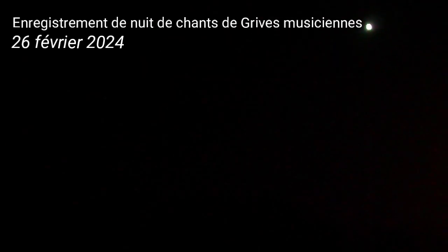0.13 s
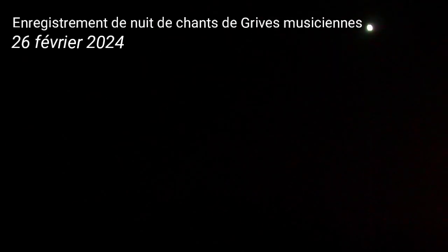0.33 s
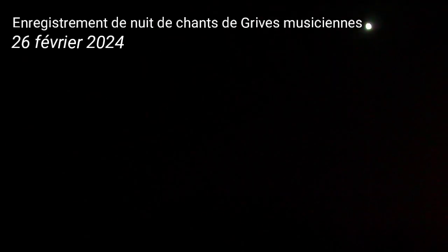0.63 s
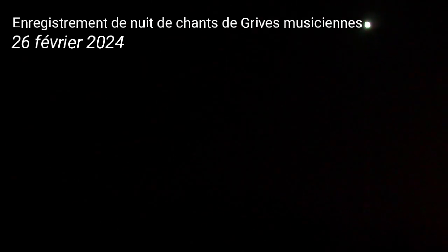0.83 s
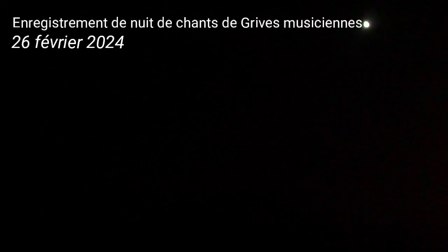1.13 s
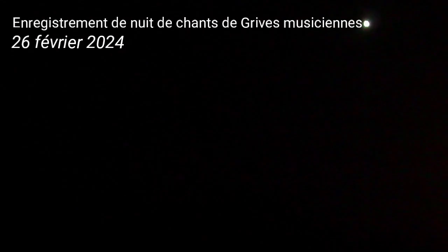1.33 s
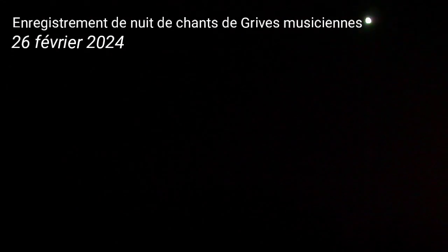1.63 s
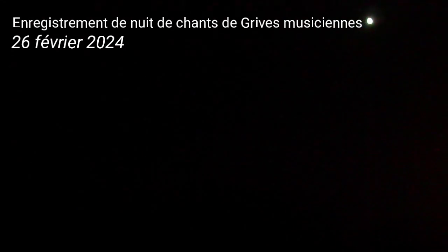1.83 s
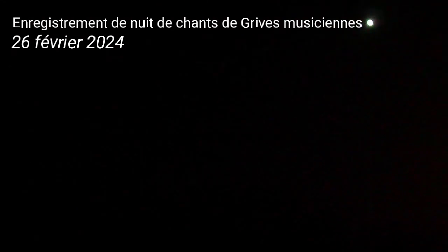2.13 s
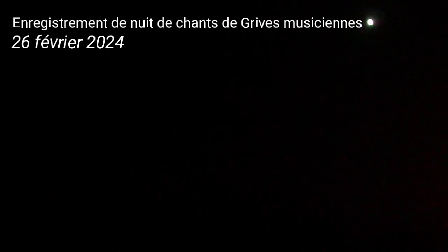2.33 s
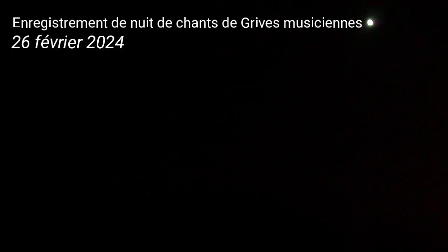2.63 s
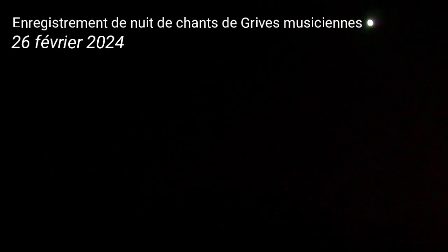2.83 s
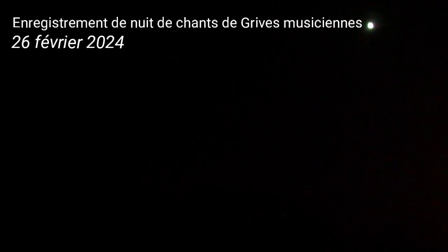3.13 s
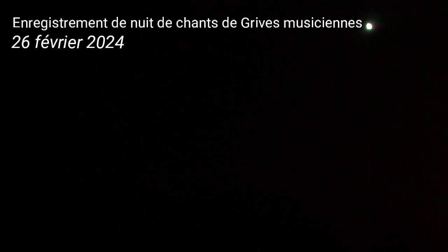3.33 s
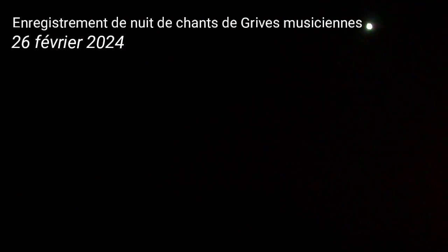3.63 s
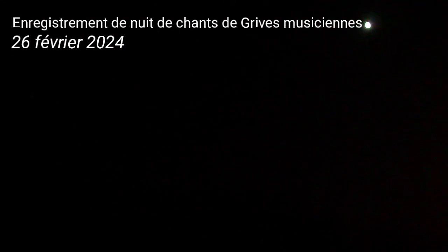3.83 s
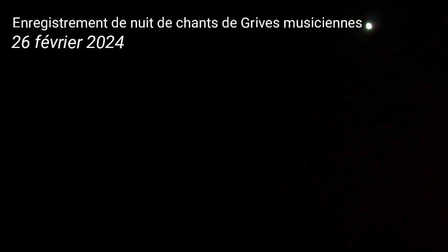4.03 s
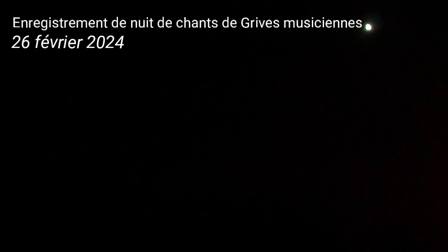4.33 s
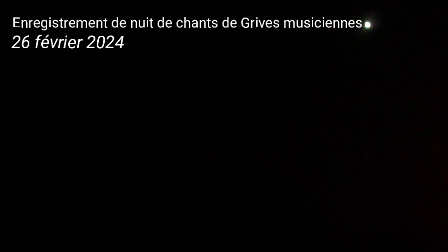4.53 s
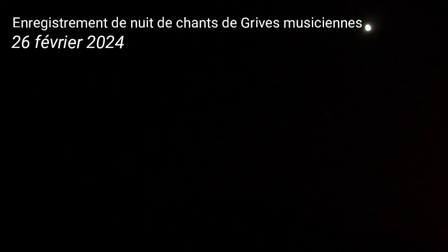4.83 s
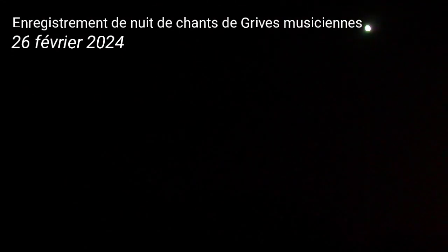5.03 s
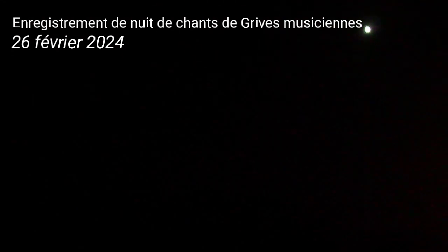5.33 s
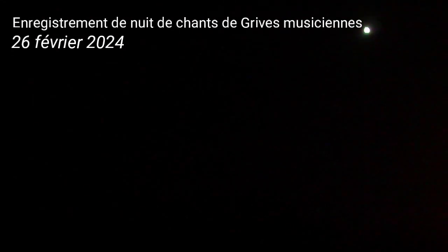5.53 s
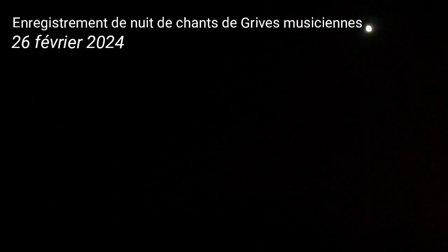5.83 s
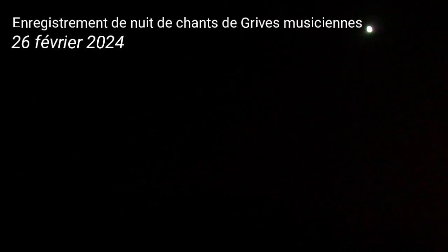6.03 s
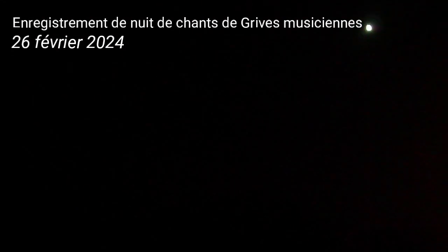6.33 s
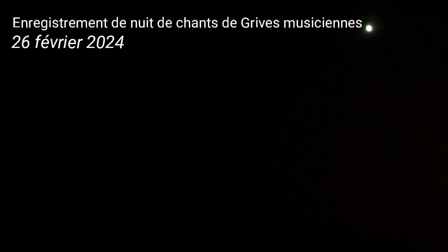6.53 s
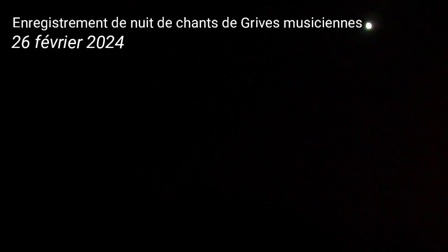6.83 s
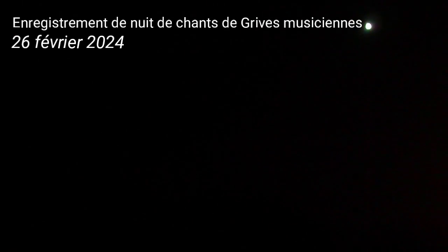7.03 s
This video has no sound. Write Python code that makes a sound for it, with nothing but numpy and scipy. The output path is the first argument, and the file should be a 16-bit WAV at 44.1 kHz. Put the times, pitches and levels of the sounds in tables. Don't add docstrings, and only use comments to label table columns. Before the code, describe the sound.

Outdoors at night, song thrushes sing at different distances among trees. A far fluted phrase ending in an upward glide comes early, then looping high whistles, chattering chirps and bright trills, with the fluted phrase returning several times in the second half. A twig snaps dryly near the microphone around three seconds. Woodland echo trails the notes; a thin, buzzy high electronic whine, low hum and soft hiss run throughout.

```python
import sys
import numpy as np
from scipy import signal
from scipy.fft import rfft, irfft, next_fast_len
from scipy.io import wavfile
from scipy.ndimage import uniform_filter1d, map_coordinates

SR = 44100
rng = np.random.default_rng(int(sys.argv[2]) if len(sys.argv) > 2 else 0)


def to_linear_factor(level_db):
    exponent = np.asarray(level_db, float) / 20
    return 10 ** exponent


def to_wav(sig):
    pcm = np.clip(np.atleast_2d(sig), -1, 1) * 32767
    pcm = np.round(pcm).astype(np.int16)
    wavfile.write(sys.argv[1], SR, pcm.T)


N = 316638
TIME = np.arange(N) / SR

# start_s, length_s, centre_hz, swing_hz, level_db
WARBLES = [
    (6.7, 0.031, 4820, 450, -41.5),
    (6.081, 0.035, 5130, 260, -37.5),
    (6.18, 0.02, 4800, 190, -33.5),
]


def waver(count, rate):
    knots = rng.standard_normal(256)
    return 1.17 * np.interp(np.arange(count) * rate / SR, np.arange(256), knots, period=256)


def add(track, start_s, x):
    i = int(start_s * SR)
    track[i:i + len(x)] += x[:len(track) - i]


def sing(hz, db, partials_db=(0,), edge_s=0.0015, flutter_db=0.8, jitter=0.0048, husk=0.078):
    t = np.arange(len(hz)) / SR
    ends = np.clip(np.minimum(t, t[-1] - t) / edge_s, 0, 1)
    unsteady_hz = hz * (1 + jitter * waver(len(t), 166.0))
    phase = 2 * np.pi * (np.cumsum(unsteady_hz) / SR + rng.random())
    tone = np.zeros(len(t))
    for k, partial_db in enumerate(partials_db, 1):
        tone += to_linear_factor(partial_db + k * flutter_db * waver(len(t), 83.7)) * np.sin(k * phase)
    return np.sqrt(2) * to_linear_factor(db) * ends * tone * (1 + husk * waver(len(t), 700))


def add_note(track, rows, partials_db=(0,), round_s=0.0032, jitter=0.0055):
    s, hz, db = np.transpose(rows)
    t = np.arange(s[0], s[-1], 1 / SR)
    pitch = uniform_filter1d(np.interp(t, s, hz), max(int(round_s * SR), 1), mode="nearest")
    add(track, max(s[0], 0), sing(pitch, np.interp(t, s, db), partials_db, jitter=jitter))


def add_warbles(track, rows):
    sink_hz_s, cycles_per_swing = 15800, 28
    for s, length, hz, swing, db in rows:
        t = np.arange(0, length, 1 / SR)
        swinging = swing * np.sin(2 * np.pi * hz / cycles_per_swing * t)
        add(track, s, sing(hz - sink_hz_s * t + swinging, db))


def electronics(whine_db=-41.5, hum_db=-51.0, hum_wobble_db=0.1):
    hum_hz, flip_hz, flip_at_s, whine_order = 50.006, 72.42587, .01106, 132
    beats = flip_hz * (TIME - flip_at_s)
    polarity = np.sign(np.sin(np.pi * beats))
    whine = to_linear_factor(whine_db) * polarity * np.sin(2 * np.pi * whine_order * beats)
    hum = to_linear_factor(hum_db + hum_wobble_db * waver(N, 9)) * np.sin(2 * np.pi * hum_hz * TIME)
    return np.sqrt(2) * (whine + hum)


def night():
    # pitch_hz, level_db (per Hz)
    hiss_floor = [(22, -69.5), (33, -73.5), (42, -75.5), (65, -78.5), (110, -82.5), (220, -82.5),
                  (680, -85.5), (1100, -91), (1700, -95.5), (3500, -98.5), (6500, -97), (8600, -96.5),
                  (11000, -85.5), (13000, -97), (15500, -108.5)]
    # pitch_hz, level_db
    drones = [
        (225, -69),
        (680, -66.5),
    ]
    size = next_fast_len(N)
    hz = np.maximum(np.arange(size // 2 + 1) * SR / size, 1)
    floor_hz, floor_db = np.transpose(hiss_floor)
    db = np.interp(np.log(hz), np.log(floor_hz), floor_db)
    sound = irfft(rfft(rng.standard_normal(size)) * to_linear_factor(db) * np.sqrt(SR / 2), size)[:N]
    for drone_hz, drone_db in drones:
        sound += to_linear_factor(drone_db) * waver(N, 21) * np.sin(2 * np.pi * drone_hz * TIME)
    return sound


def flutist():
    # time_s, pitch_hz, level_db
    phrase = [
        [(.153, 1942, -54.5), (.171, 2215, -47.5), (.18, 2384, -38), (.19, 2450, -37), (.204, 2420, -48)],
        [(.15, 1902, -60.5), (.172, 2360, -59), (.19, 2460, -62)],
        [(.174, 2880, -45), (.188, 3216, -40.5), (.198, 3013, -38), (.215, 2930, -34), (.24, 2939, -33.5),
         (.258, 2960, -29)],
        [(.254, 2463, -43), (.268, 2420, -34)],
        [(.366, 2587, -30.5), (.4, 2780, -35.5), (.422, 2884, -32.5), (.456, 3300, -32), (.478, 3610, -35)],
        [(.42, 5700, -72), (.447, 6260, -64), (.478, 7200, -54.5), (.484, 7500, -60)],
    ]
    # second_db, third_db
    phrase_overtones = [(-33, -25), (10, 1), (-30, -60), (-25, -57), (-40, -60), (-60, -60)]
    # time_s, pitch_hz, level_db
    reed = [
        [(.172, 1730, -50), (.184, 1904, -44), (.2, 1840, -61.5)],
        [(.255, 1880, -45), (.29, 1783, -57), (.325, 1776, -57), (.34, 1660, -42)],
    ]
    # first_db, second_db, third_db
    reed_partials_db = (-16, -2.5, 0)
    # opening_delay_s, glide_delay_s, opening_db, glide_db, reed_db
    repeats = [
        (-.68, -.68, -3, -3, 0),
        (0, 0, 1.5, 1.5, 0),
        (3.648, 3.639, 2.5, 1.5, -3),
        (4.307, 4.29, -1, .5, 0),
        (5.136, 5.141, 1, 2, -3),
        (5.949, 5.959, 1, 1, -7),
    ]
    # handover_s, glide_top_hz, held_gain_db
    handovers = [(0.344, 4100, -5), (.345, 4100, -1.5), (.3, 3700, -2.5), (.305, 4370, 1),
                 (.332, 4250, 1.5), (.352, 4000, -1)]
    lead_s = 1
    marks_s = (.25, .44)
    low_hz, low_db = 2420, -36.5
    foot_hz, foot_db, break_s = 2455, -37, .008
    *opening, swell, glide_body, overtone = phrase
    out = np.zeros(N + lead_s * SR)
    for (*delays, open_db, glide_db, reed_db), (turn, top, held_db) in zip(repeats, handovers):
        def timed(rows, gain_db):
            return [(lead_s + s + np.interp(s, marks_s, delays), hz, db + gain_db) for s, hz, db in rows]

        held = swell + [(turn - .02, low_hz, low_db), (turn, low_hz + 20, low_db - 12)]
        glide = [(turn + break_s, foot_hz, foot_db)] + glide_body + [(.49, top, -52.5), (.502, top + 30, -58)]
        notes = [*opening, held, glide, overtone]
        gains_db = (open_db,) * 3 + (open_db + held_db, glide_db, glide_db)
        for rows, overtones, gain_db in zip(notes, phrase_overtones, gains_db):
            add_note(out, timed(rows, gain_db), (0, *overtones), round_s=0.004, jitter=0.0031)
        for rows in reed:
            add_note(out, timed(rows, reed_db), reed_partials_db)
    return out


def wood(x, early_db, late_db, early_t60=.2, low_t60=1.1, high_t60=.6, split_hz=4500,
         gap_s=0.0046, stir=0.4, sway_s=0.000093):
    t = TIME[:3 * SR // 2]
    sparse, noise = rng.standard_normal((2, len(t)))
    early = sparse ** 3 * to_linear_factor(-60 * t / early_t60)
    low = signal.sosfilt(signal.butter(4, split_hz, fs=SR, output="sos"), noise)
    late = low * to_linear_factor(-60 * t / low_t60) + (noise - low) * to_linear_factor(-60 * t / high_t60)
    tail = to_linear_factor(early_db) * early / np.linalg.norm(early) + to_linear_factor(late_db) * late / np.linalg.norm(late)
    stirred = x * (1 + stir * waver(len(x), 120)) / np.hypot(1, stir)
    echo = signal.oaconvolve(stirred, tail * np.clip(t / gap_s, 0, 1))[:len(x)]
    sway = sway_s * SR * uniform_filter1d(waver(len(x), 37), size=400)
    return x + map_coordinates(echo, [np.arange(len(x)) + sway], mode="nearest")


def chirps(fade_db=-5, faint_db=-45, echo_s=0.0039, echo_db=-13):
    # start_s, length_s, first_hz, last_hz, level_db
    held = [(.001, 0.04, 6830, 4900, -50.5), (.045, 0.046, 6080, 7000, -48.5),
            (.082, 0.043, 6830, 5620, -46.5), (.56, 0.04, 5160, 4700, -59), (1.258, 0.11, 6750, 6250, -61),
            (1.399, 0.062, 3910, 4370, -48.5), (1.401, 0.065, 7460, 8600, -57),
            (1.559, 0.083, 4020, 4160, -54), (1.678, 0.11, 4300, 3970, -51), (1.86, 0.058, 4110, 4080, -54),
            (1.8, 0.1, 4520, 4440, -58), (1.79, 0.068, 4100, 4130, -57), (1.99, 0.1, 4440, 4280, -60),
            (2.051, 0.11, 3210, 3220, -60), (2.584, 0.083, 4020, 3740, -54),
            (2.677, 0.037, 4140, 4030, -60), (2.758, 0.069, 3800, 3760, -51),
            (2.821, 0.08, 3720, 3470, -57), (3.222, 0.029, 4300, 4560, -34.5),
            (3.302, 0.031, 3410, 4470, -32.5), (4.576, 0.042, 4560, 3150, -36.5),
            (5.313, 0.037, 7700, 5780, -62), (5.868, 0.059, 2600, 2600, -44),
            (4.17, 0.023, 1890, 1860, -57), (4.375, 0.026, 2000, 1940, -58),
            (4.575, 0.045, 1900, 1850, -64), (4.73, .03, 2117, 2030, -58), (.92, .04, 4460, 4660, -57),
            (1.69, 0.05, 4600, 4340, -55), (3.641, 0.05, 3680, 3640, -52),
            (3.945, 0.071, 2866, 2650, -30.5), (.295, 0.048, 2930, 2954, -35.5),
            (2.038, 0.025, 5890, 5880, -30), (4.775, 0.015, 3203, 3675, -27), (4.8, 0.069, 3500, 3440, -44),
            (.375, 0.029, 5540, 4500, -64), (.585, .045, 4050, 4080, -56),
            (4.305, 0.046, 3250, 3650, -33.5), (4.35, 0.076, 2880, 2670, -32),
            (4.794, 0.061, 2780, 2670, -31.5), (7.103, 0.043, 4420, 3860, -62)]
    # start_s, first_hz, last_hz, level_db
    drops = [(.732, 5430, 3070, -36.5), (2.161, 5180, 3930, -37), (2.193, 4100, 3500, -35),
             (2.303, 4440, 3560, -36), (2.329, 4660, 3800, -52), (2.402, 3200, 3380, -32),
             (2.469, 3000, 3220, -37), (2.536, 3130, 3220, -35), (3.246, 4070, 3250, -31.5),
             (3.404, 4530, 4000, -38), (4.294, 4770, 4030, -29), (4.401, 4970, 3800, -31),
             (4.691, 3900, 3610, -43), (2.233, 5220, 4360, -39), (3.012, 4120, 3320, -31.5),
             (3.136, 4300, 3380, -30), (3.201, 4620, 3880, -31.5), (3.721, 3570, 3126, -39),
             (3.754, 3990, 3504, -36.5), (4.229, 7450, 6180, -51), (3.187, 3380, 3600, -34),
             (6, 3360, 4630, -40), (5.286, 2600, 2730, -41.5), (3.586, 4000, 4800, -40),
             (4.03, 2670, 2800, -24), (4.336, 7120, 5340, -44), (4.861, 8100, 6500, -53)]
    flicks = [(.698, 4600, 5310, -52), (.717, 3410, 5280, -38), (.935, 4950, 5460, -51),
              (1.079, 5000, 6000, -57), (1.163, 3000, 2840, -51), (1.232, 2740, 2930, -51),
              (1.977, 8500, 8450, -43), (2.063, 7450, 7950, -41), (1.861, 7500, 8050, -40),
              (1.779, 7500, 7950, -42), (6.172, 5000, 5660, -52.5), (1.026, 4750, 3530, -54),
              (1.103, 4570, 3400, -58), (1.181, 4300, 3500, -57), (1.171, 3440, 3750, -50),
              (1.6, 7060, 7900, -37), (2.214, 3000, 4660, -35), (2.264, 3970, 4800, -38),
              (2.275, 3230, 4520, -31), (2.29, 4230, 4750, -44), (2.305, 3440, 4150, -40),
              (2.335, 3020, 4300, -31), (2.405, 3300, 4450, -47), (2.471, 3230, 3800, -58),
              (3.272, 3580, 4260, -37), (4.445, 3900, 2920, -38), (4.326, 4550, 3700, -26),
              (3.518, 3280, 3600, -42), (3.578, 3560, 4120, -38), (3.591, 3220, 3340, -44),
              (3.761, 3070, 3430, -42), (4.132, 6860, 5100, -50), (3.322, 6180, 5350, -53),
              (4.542, 3920, 4280, -32), (4.809, 5520, 5600, -55), (4.903, 5437, 4350, -57),
              (5.044, 7250, 5260, -57), (5.066, 2740, 3100, -39.5), (5.072, 6950, 4920, -53),
              (5.133, 2630, 3390, -41.5), (5.209, 2670, 3010, -43.5), (7.167, 4030, 3830, -54)]
    slides = [(.605, 4700, 4020, -61), (.958, 4730, 3520, -51.5), (.997, 4240, 6040, -58),
              (2.137, 4066, 4190, -25.5), (2.2, 3830, 4160, -36), (2.924, 3680, 3750, -51),
              (2.992, 4100, 4670, -35.5), (3.111, 3840, 5020, -34.5), (3.221, 7200, 5250, -50),
              (3.281, 3220, 3480, -47), (3.295, 4800, 3480, -35), (3.281, 4450, 4530, -38.5),
              (4.446, 7600, 4900, -48), (3.44, 3120, 3170, -55), (3.524, 4200, 4390, -36),
              (3.69, 3090, 3420, -43.5), (3.698, 3850, 4230, -36.5), (4.068, 4150, 3955, -30.5),
              (4.234, 5210, 4950, -59), (4.3, 5400, 5150, -37), (4.72, 5700, 3540, -62),
              (4.888, 3314, 2440, -33), (5.729, 2990, 4195, -40.5)]
    # start_s, length_s, foot_hz, turning_hz, level_db
    arches = [(1.092, 0.011, 3680, 3950, -50), (1.243, 0.015, 4220, 3250, -53),
              (2.241, 0.015, 4610, 3340, -31.5), (3.182, 0.011, 3500, 4900, -37),
              (3.208, 0.018, 3540, 4680, -27.5), (3.333, 0.013, 4320, 4900, -39),
              (3.333, 0.021, 5350, 5400, -49), (3.344, 0.014, 3770, 4810, -35),
              (3.389, 0.0126, 4080, 5400, -42), (3.414, 0.022, 3530, 4390, -32.5),
              (3.437, 0.025, 5940, 6450, -63), (3.544, 0.015, 3590, 4060, -33.5),
              (3.621, 0.013, 4170, 3590, -32.5), (4.101, 0.012, 4980, 5860, -49),
              (4.118, 0.0083, 4970, 5600, -41), (4.232, 0.016, 4450, 4570, -27),
              (4.416, 0.036, 4700, 4830, -32), (4.55, 0.011, 3820, 4800, -34),
              (4.56, 0.011, 3290, 3900, -25), (4.994, 0.011, 3214, 2800, -37)]
    # start_s, length_s, top_hz, last_hz, level_db
    hooks = [
        (0.738, 0.039, 3540, 2850, -37.5),
        (1.455, 0.029, 4800, 4590, -41),
        (3.435, 0.03, 4380, 3870, -37),
        (4.52, 0.021, 4450, 3300, -32.5),
        (4.619, 0.02, 5000, 3100, -33.5),
    ]
    # start_s, length_s, first_hz, last_hz, level_db
    rises = [
        (3.9, 0.053, 3250, 3590, -36),
        (.693, 0.0265, 3500, 4300, -51),
    ]
    # start_s, length_s, first_hz, rest_hz, level_db
    elbows = [
        (0.061, 0.22, 2940, 2860, -63),
        (2.998, .018, 5400, 5700, -54),
        (3.102, 0.032, 7260, 5570, -53),
        (3.324, 0.036, 3000, 2700, -54),
        (6.009, 0.029, 4450, 3990, -37),
    ]
    straight = list(held)
    for table, length in ((drops, 0.00864), (flicks, 0.0113), (slides, 0.02115)):
        straight += [(s, length, *rest) for s, *rest in table]
    # start s, length s, share before the turn, first, middle and last Hz, dB
    bent = [(s, length, .5, a, (a + b) / 2, b, db) for s, length, a, b, db in straight]
    bent += [(s, length, .5, a, b, 0.892 * a, db) for s, length, a, b, db in arches]
    bent += [(s, length, 0.23, 0.81 * a, a, b, db) for s, length, a, b, db in hooks]
    bent += [(s, length, .4, a, a + 0.9 * (b - a), b, db) for s, length, a, b, db in rises]
    bent += [(s, length, 0.263, a, b, b, db) for s, length, a, b, db in elbows]
    loud, faint = np.zeros((2, N))
    for s, length, turn, first, middle, last, db in bent:
        rows = [(s, first, db + fade_db), (s + turn * length, middle, db), (s + length, last, db + fade_db)]
        add_note(faint if db < faint_db else loud, rows, round_s=0.0031)
    faint = faint * (0.96 + .5 * waver(N, 310))
    return loud + faint + to_linear_factor(echo_db) * np.roll(faint, int(echo_s * SR))


def add_squeaks(track, shiver_hz_s=19000, shiver_rate=135, top_db=-7, foot_db=-8, lift_hz_s=8000):
    # start_s, hold_s, fall_s, last_hz, level_db
    squeak_table = [
        (6.781, 0.0019, 0.024, 4050, -41),
        (6.87, 0.0082, .026, 4220, -40.5),
        (6.943, 0.022, 0.015, 5300, -46),
    ]
    leap_s, foot_hz, top_hz = 0.009, 3000, 6600
    for s, hold, fall, last, db in squeak_table:
        marks = np.cumsum([0, leap_s, hold, fall])
        t = np.arange(0, marks[-1], 1 / SR)
        shiver = -shiver_hz_s * fall * np.sin(2 * np.pi * shiver_rate * np.maximum(t - leap_s, 0))
        pitch = np.interp(t, marks, [foot_hz, top_hz, top_hz + lift_hz_s * hold, last])
        swell_db = np.interp(t, marks, [foot_db, top_db, top_db + 250 * hold, 0])
        add(track, s, sing(pitch + shiver, db + swell_db))


def open_birds():
    # time_s (from its top), pitch_hz, level_db
    chuck = [(-.013, 2400, -62), (0, 3450, -48.5), (.006, 2750, -54), (.011, 2200, -63),
             (.014, 2150, -54.5), (.019, 2150, -60)]
    # top_s, stretch (ratio), gain_db
    chuck_times = [
        (.951, 0.94, 0.5),
        (1.016, 0.98, 1.1),
        (1.09, 0.98, 1),
        (1.161, 1.2, 0.92),
        (1.231, 1.03, 1.3),
    ]
    out = np.zeros(N)
    for s, stretch, gain_db in chuck_times:
        add_note(out, [(s + stretch * t, hz, db + gain_db) for t, hz, db in chuck], round_s=0.0023)
    add_warbles(out, WARBLES[:1])
    add_squeaks(out)
    return out


def whistles():
    # time_s, pitch_hz, level_db
    clear = [
        [(1.419, 5200, -51), (1.443, 6260, -33), (1.45, 5940, -34.5), (1.469, 6710, -29), (1.487, 6690, -26.5),
         (1.502, 5820, -36)],
        [(5.745, 2765, -38), (5.757, 3100, -30.5), (5.768, 2880, -34.5), (5.795, 2120, -41.5),
         (5.831, 2595, -36), (5.858, 2547, -31)],
        [(2.941, 3920, -32.5), (2.969, 4350, -36), (2.975, 4010, -38), (2.989, 3830, -28), (2.996, 3100, -49.5),
         (3.014, 2760, -49.5)],
        [(3.072, 3680, -32), (3.091, 4300, -25), (3.099, 3630, -31.5), (3.121, 2800, -60), (3.139, 2550, -49)],
        [(5.926, 2640, -40), (5.932, 3270, -31.5), (5.953, 3163, -33), (5.962, 2860, -36)],
    ]
    # time_s (from its start), pitch_hz, level_db
    tick = [(0, 5000, -50), (.004, 5100, -47), (.006, 5600, -52), (.008, 6900, -66), (.013, 6950, -57),
            (0.028, 6600, -52)]
    ticks_s = [
        5.192,
        5.23,
        5.271,
    ]
    # low_dip_s, leap_top_hz, high_centre_hz, swing_share, gain_db
    loops = [
        (1.627, 7400, 7510, 0.86, -0.5),
        (1.803, 7330, 7620, 0.69, -1),
        (2.005, 7640, 7610, 0.91, -3.5),
    ]
    # time_s (from the dip), pitch_hz, level_db
    low_loop = [(-.018, 5690, -29), (0, 5180, -34.5), (0.014, 6380, -24.5), (0.041, 5810, -31)]
    # time_s (from the dip), offset_hz (from its centre), level_db
    high_loop = [(-.019, 602, -42), (0, -680, -25.5), (.008, -520, -28), (.023, 884, -39),
                 (0.034, 120, -31.5), (.05, -1180, -21), (0.061, 202, -38)]
    leap_start = (-.049, 5100, -30.5)
    leap_db, leap_fall_hz_s = -31, 63500
    dip_hz = low_loop[1][1]
    notes = clear + [[(s + t, hz, db) for t, hz, db in tick] for s in ticks_s]
    for s, top, centre, swing, gain_db in loops:
        leap_top = ((dip_hz - top) / leap_fall_hz_s, top, leap_db)
        low = [leap_start, leap_top] + low_loop
        notes.append([(s + t, hz, db + gain_db) for t, hz, db in low])
        notes.append([(s + t, centre + swing * hz, db + gain_db) for t, hz, db in high_loop])
    out = np.zeros(N)
    for rows in notes:
        add_note(out, rows, round_s=0.0065)
    return out


def trills(sharp=5.28, flick_db=-8, drift=0.178):
    # first_flick_s, length_s, rest_hz, beats_per_s, level_db
    trill_table = [
        (2.163, 0.041, 3996, 75, -27.5),
        (4.087, 0.0485, 3925, 64, -24.5),
        (4.18, 0.043, 4050, 61, -23.5),
        (4.3, 0.029, 4160, 61, -29.5),
        (4.418, 0.0366, 3980, 70, -28.5),
        (4.304, 0.019, 5210, 113, -34),
        (4.406, 0.017, 5120, 153, -37),
    ]
    flick_hz, sink_hz_s = 522, 3000
    out = np.zeros(N)
    for s, length, hz, rate, db in trill_table:
        t = np.arange(0, length, 1 / SR)
        flick = np.abs(np.cos(np.pi * rate * t)) ** sharp
        sinking = hz - sink_hz_s * (t - length / 2)
        pitch = sinking + flick_hz * flick * (1 + drift * waver(len(t), rate))
        add(out, s, sing(pitch, db + flick_db * flick, jitter=0.012))
    add_warbles(out, WARBLES[1:])
    return out


def twig():
    # start_s, peak_db, t60_s
    snaps = [
        (2.241, -34, 0.0052),
        (3.237, -21, 0.0024),
        (3.245, -16, 0.022),
    ]
    # pitch_hz, level_db
    modes = [(1300, -7), (1900, -0.5), (3000, -6), (4700, 6.5), (6500, -17)]
    t = TIME[:SR // 20]
    ring = sum(to_linear_factor(db) * np.sin(2 * np.pi * hz * t) for hz, db in modes) * to_linear_factor(-60 * t / 0.0037)
    out = np.zeros(N)
    for s, db, t60 in snaps:
        splinters = rng.standard_normal(len(t)) ** 3 * to_linear_factor(-60 * t / t60)
        crack = np.convolve(splinters, ring)
        add(out, s, to_linear_factor(db) * crack / np.abs(crack).max())
    snap = signal.sosfilt(signal.butter(2, (1150, 8000), "band", fs=SR, output="sos"), out)
    thud = signal.sosfilt(signal.butter(2, (170, 520), "band", fs=SR, output="sos"), out)
    return snap + to_linear_factor(-3.0) * thud


def scene():
    far = wood(flutist(), -1.2, -4.0, early_t60=0.13, low_t60=1.094, high_t60=0.64,
               split_hz=4150, stir=0.5, sway_s=.00008)[-N:]
    open_air = open_birds()
    among_trees = whistles() + chirps() + trills() + 0.47 * open_air
    near = .5 * open_air + wood(among_trees, -5, -7.0, early_t60=0.14, low_t60=1.09, high_t60=0.45)
    return (far + near + twig() + night())[None]


def roll_off(x):
    return signal.sosfilt(signal.butter(12, 15740, fs=SR, output="sos"), x)


def record(dry):
    mix = dry + electronics()
    return roll_off(mix)


dry = scene()
out = record(dry)
to_wav(out)
```